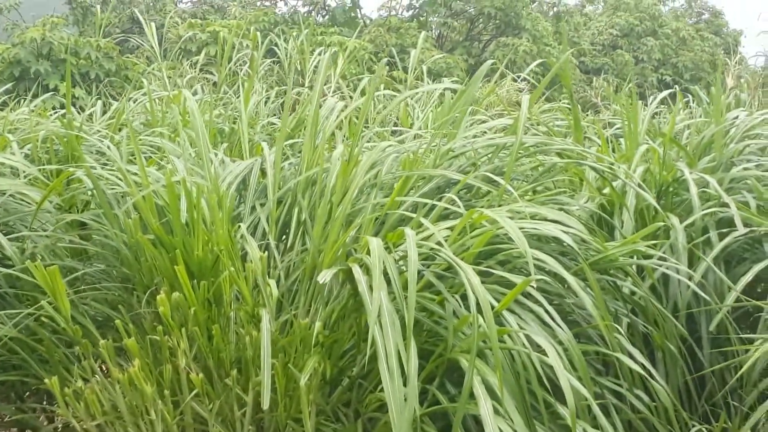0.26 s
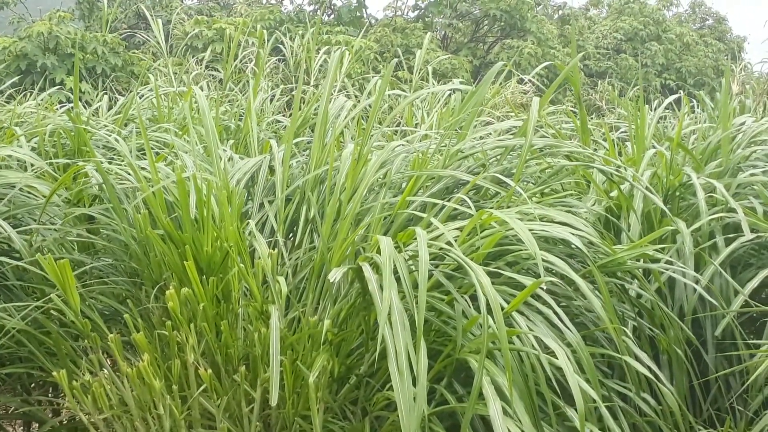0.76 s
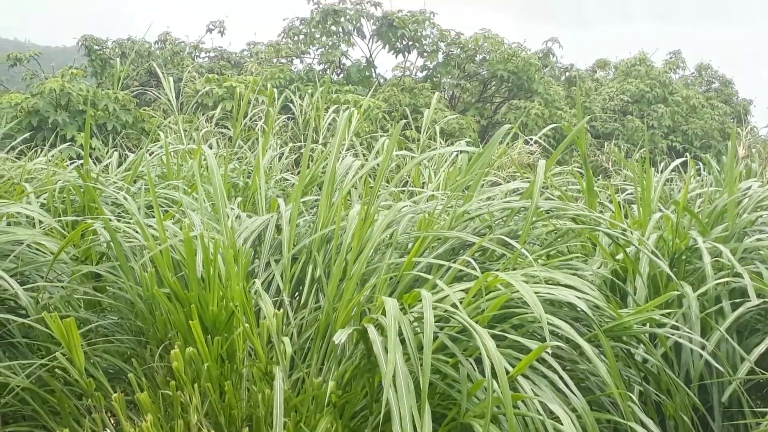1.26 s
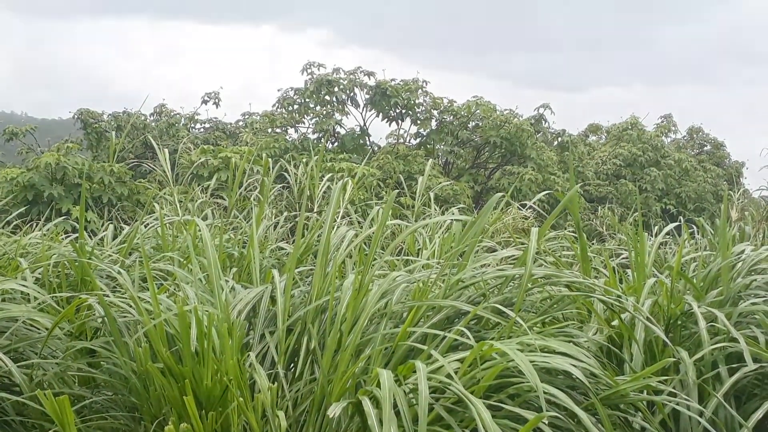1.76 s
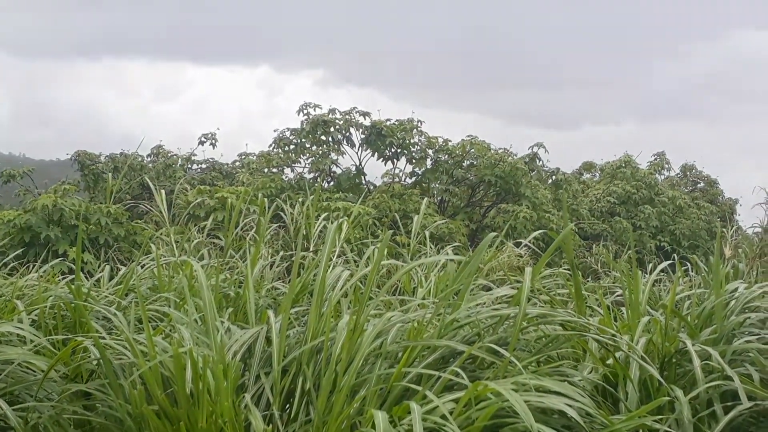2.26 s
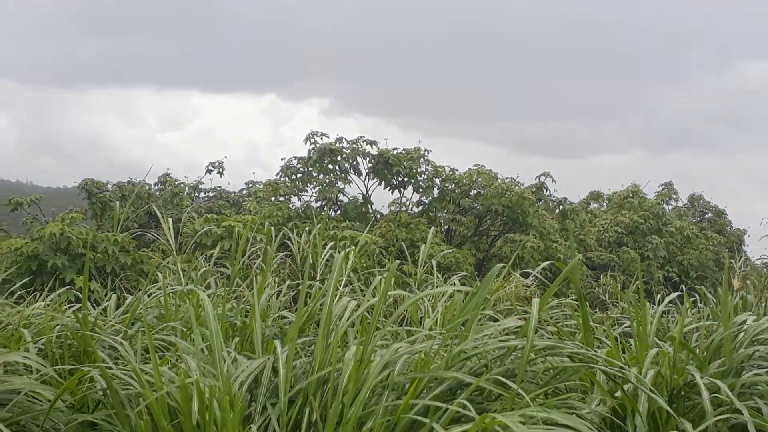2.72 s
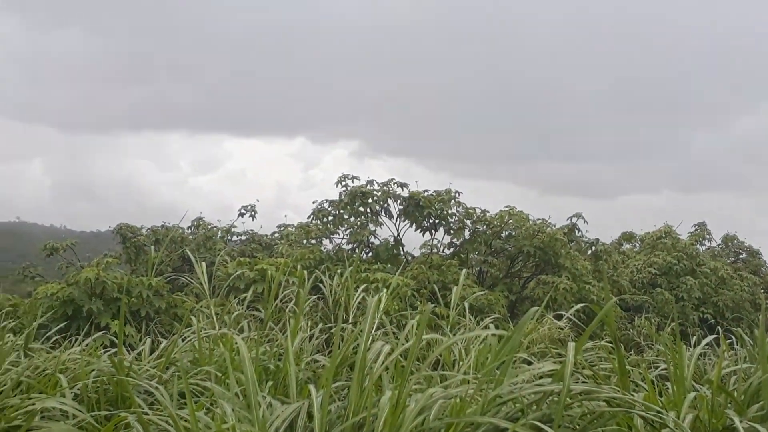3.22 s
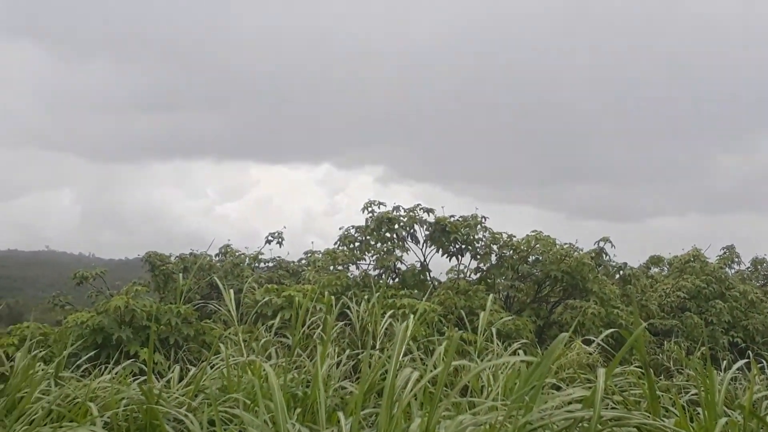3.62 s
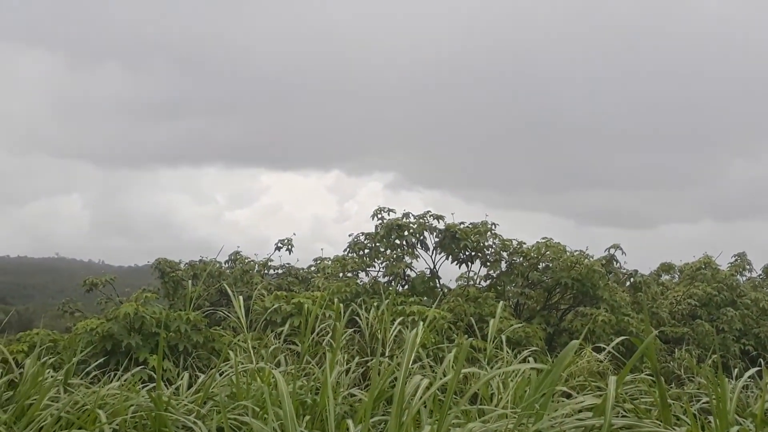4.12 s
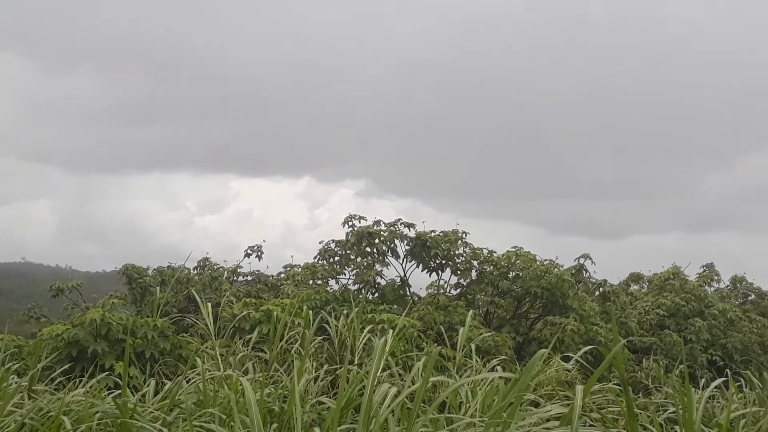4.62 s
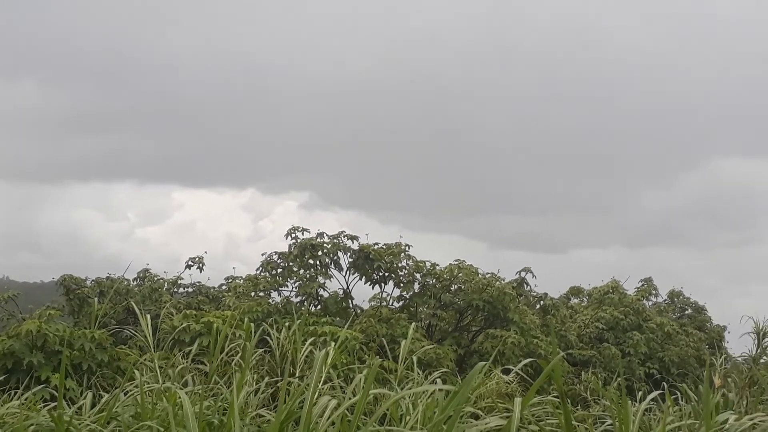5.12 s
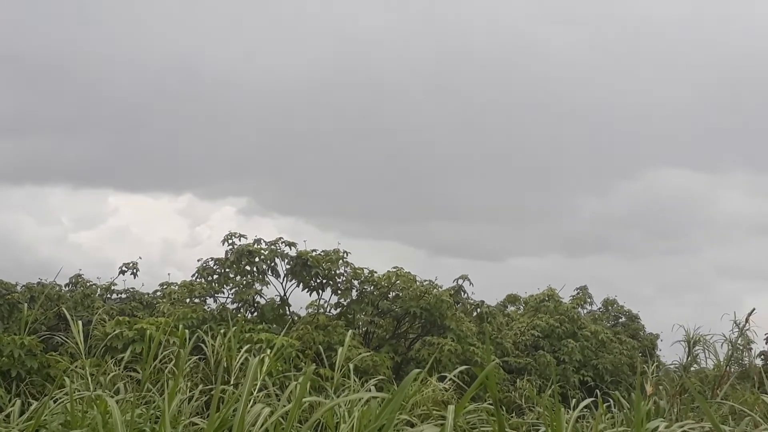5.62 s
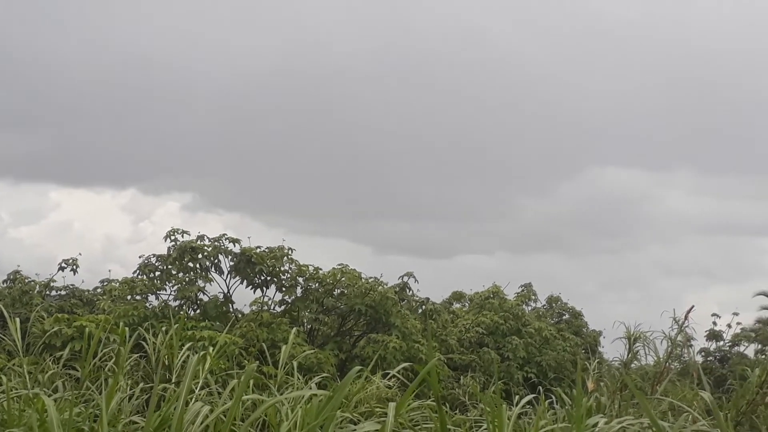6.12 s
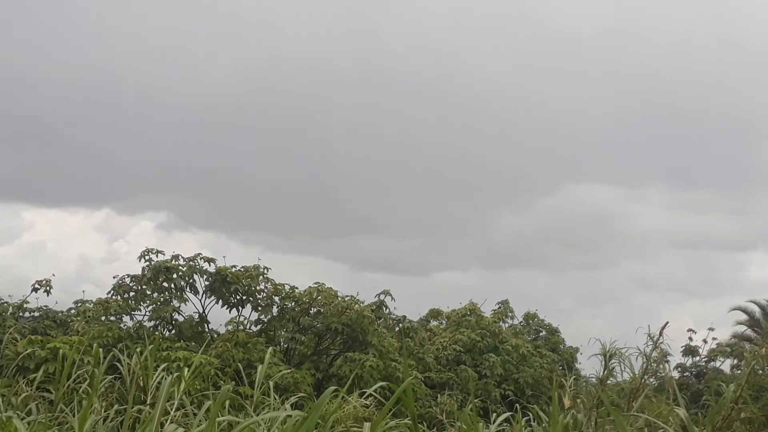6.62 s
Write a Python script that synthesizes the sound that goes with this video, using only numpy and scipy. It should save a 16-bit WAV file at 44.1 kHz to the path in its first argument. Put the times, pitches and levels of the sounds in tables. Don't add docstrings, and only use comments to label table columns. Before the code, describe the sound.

A small microphone stands among wet grass blades. Rain hiss runs throughout, under crisp irregular patter, bright ticks and a few hollow knocks. After about two seconds a bird gives thin gliding whistles, mostly falling, with one rising chirp; a very faint insect buzz follows. A low gust swells near four seconds, and the rain gradually eases while sparse drops and weak bird notes continue over a barely audible motor.

```python
import sys
import numpy as np
from scipy import signal
from scipy.fft import rfft, irfft
from scipy.io import wavfile

SR = 44100
rng = np.random.default_rng(int(sys.argv[2]) if len(sys.argv) > 2 else 0)


def convert_level_to_amplitude(level_db):
    exponent = np.asarray(level_db, float) / 20
    return 10 ** exponent


def pcm_store(signal):
    levels = np.round(np.clip(np.atleast_2d(signal), -1, 1) * 32767)
    wavfile.write(sys.argv[1], SR, levels.astype(np.int16).T)


N = 302967
TREBLE_TOP_HZ = 15830


def rms_one(x):
    return x / np.sqrt(np.mean(x ** 2) + 1e-20)


def peak_one(x):
    return x / np.abs(x).max()


def in_time(rows):
    s, *columns = np.transpose(rows)
    return [np.interp(np.arange(N) / SR, s, c) for c in columns]


def at_hz(points, hz):
    point_hz, point_db = np.transpose(points)
    return np.interp(np.log(hz), np.log(point_hz), point_db)


def colour(x, spectrum):
    hz = np.maximum(np.arange(N // 2 + 1) * SR / N, 1)
    return irfft(rfft(x) * convert_level_to_amplitude(at_hz(spectrum, hz)), N)


def band(x, low_hz, high_hz):
    edges = [low_hz, min(high_hz, .45 * SR)]
    return signal.sosfilt(signal.butter(2, edges, "band", fs=SR, output="sos"), x)


def drift(rate):
    r = np.exp(-80 * np.pi * rate / SR)
    slow = signal.lfilter([1], [1, -2 * r, r * r], rng.standard_normal(N // 40 + 2002))[2000:]
    return np.interp(np.arange(N) / 40, np.arange(len(slow)), rms_one(slow))


def ring(clicks, hz, t60):
    r, w = convert_level_to_amplitude(-60 / (t60 * SR)), 2 * np.pi * hz / SR
    return signal.lfilter([0, np.sin(w)], [1, -2 * r * np.cos(w), r * r], clicks + 1e-18)


def fade(t, t60):
    return convert_level_to_amplitude(-60 * t / t60)


def hiss(patchy_db):
    out, together = 0, drift(23.5)
    edges = 200 * 2 ** np.arange(0, 6.9, .5)
    white = rng.standard_normal((2, N))
    for k, (low, high) in enumerate(zip(edges, edges[1:])):
        gain = convert_level_to_amplitude(patchy_db * (0.091 * together + drift(23.0)))
        out = out + gain * band(white[k % 2], low, high)
    return out


def patter(per_s, spread_db, cycles, splash_db):
    largest = 1.8
    sizes = convert_level_to_amplitude(spread_db * np.minimum(rng.exponential(1, N), largest)) * rng.choice([-1, 1], N)
    born = rng.random(N) < per_s * convert_level_to_amplitude(3.2 * drift(20.0)) / SR
    pitches, dealt = np.geomspace(500, 15000, 18), rng.integers(0, 18, N)
    spray = rng.standard_normal(N)
    fizz = signal.lfilter([1], [1, -fade(1 / SR, 0.024)], np.abs(sizes * born))
    out = convert_level_to_amplitude(-16.5) * band(fizz * np.roll(spray, 999), 5000, 21000)
    for k, hz in enumerate(pitches):
        clicks = sizes * born * (dealt == k)
        wet = signal.lfilter([1], [1, -fade(1 / SR, 0.016)], np.abs(clicks))
        leaf = ring(clicks + convert_level_to_amplitude(splash_db) * wet * spray, hz, cycles / hz)
        out = out + leaf * (hz / 3000) ** 0.78
    return out


# (t/s, level/dB)
SHOWER = [(0.0, -50), (0.31, -52.5), (0.55, -50.5), (1.24, -49.5), (1.51, -48.5), (2.1, -49), (2.35, -51.5),
          (2.58, -50.5), (2.68, -52.5), (2.85, -51), (3.6, -52), (4.26, -52.5), (4.61, -52), (4.95, -53.5),
          (5.7, -54.5), (6.05, -53), (6.56, -55), (6.87, -54)]
# (f/Hz, level/dB per Hz)
FOLIAGE_COLOUR = [(180, -42), (300, -7), (397, -10.5), (808, -3.5), (968, -5), (1730, 1), (2610, 2),
                  (3750, -1.5), (5390, -7), (7370, -5), (8280, -12.5), (10100, -30), (14300, -22.5),
                  (15500, -26)]
# (f/Hz, level/dB per Hz)
RUMBLE = [(21, -34), (35, 2.5), (48, -5), (96, -5.5), (123, 1.5), (265, -9), (500, -20.5), (650, -22.5),
          (1100, -120)]
# (t/s, level/dB)
BREEZE = [(0, -67.5), (1.6, -61.5), (3.2, -64), (4.3, -66), (4.8, -61.5), (5.4, -63), (6.87, -62.5)]


def shower():
    roar_db, treble_below_db = -65, -19.5
    (hiss_db,), (breeze_db,) = in_time(SHOWER), in_time(BREEZE)
    far = rms_one(hiss(patchy_db=1.34))
    middle = rms_one(patter(per_s=480.0, spread_db=4.0, cycles=5.3, splash_db=-24.0))
    wet = colour(far + convert_level_to_amplitude(0.5) * middle, FOLIAGE_COLOUR)
    low = signal.sosfilt(signal.butter(8, 9400, fs=SR, output="sos"), wet)
    high = signal.sosfilt(signal.butter(8, 9400, "high", fs=SR, output="sos"), wet)
    high = irfft(rfft(high) * (np.arange(N // 2 + 1) * SR / N < TREBLE_TOP_HZ), N)
    rumble = colour(rng.standard_normal(N), RUMBLE) * convert_level_to_amplitude(1.0 * drift(1.9))
    roar = band(rng.standard_normal(N), 307, 1340)
    out = convert_level_to_amplitude(roar_db) * rms_one(roar) + convert_level_to_amplitude(breeze_db) * rms_one(rumble)
    out += convert_level_to_amplitude(hiss_db - 0.94) * rms_one(low)
    return out + convert_level_to_amplitude(hiss_db + treble_below_db) * rms_one(high)


# (t/s, f/Hz, level/dB)
MOTOR = [(0, 50.2, -84), (.45, 47.5, -73), (.9, 47.7, -71.5), (2.65, 45.6, -88), (2.8, 45.1, -67.5),
         (3.5, 49.4, -65.5), (3.95, 51.4, -68), (4.2, 51.27, -78.5), (4.35, 61.8, -100), (4.5, 61.4, -67),
         (4.8, 63.2, -80), (5.25, 53.5, -79), (5.8, 53.1, -74.5), (6.4, 56.86, -67.5), (6.87, 58.2, -65)]
# (multiple, level/dB)
MOTOR_ORDERS = [(1, -9), (2, 0.1), (3, -8)]


def motor():
    hz, level_db = in_time(MOTOR)
    phase = 2 * np.pi * np.cumsum(hz * (1 + 0.0052 * drift(2.8))) / SR
    out = np.zeros(N)
    for k, order_db in MOTOR_ORDERS:
        out += convert_level_to_amplitude(level_db + order_db + 3.5 + 2.0 * drift(9.7)) * np.sin(k * phase)
    return out


# (t/s, peak level/dB, leaf f/Hz)
BURSTS = [(0.0507, -40, 1310), (0.1332, -32, 2800), (0.378, -34.5, 2100), (0.4844, -43, 1573),
          (0.5492, -38, 1730), (0.6684, -32.5, 2400), (0.9077, -34, 2130), (1.1931, -33, 1780),
          (1.497, -33, 2600), (1.6914, -39, 2050), (1.7643, -39, 2070), (1.8676, -36, 1690),
          (2.2656, -34, 2100), (3.6387, -32.5, 2640), (4.0787, -35.5, 1700), (4.15, -41, 2000),
          (4.7287, -49, 1830), (5.265, -39, 1460)]
# (t/s, peak level/dB, leaf f/Hz)
SNAPS = [(0.004, -31, 2250), (0.0363, -44, 2440), (0.5631, -32.5, 7450), (0.7552, -31, 1760),
         (0.7625, -29.5, 4320), (0.7705, -38, 3200), (0.791, -30, 3340), (0.994, -35, 1560),
         (1.268, -30.5, 2520), (1.2935, -32, 2280), (1.3467, -30, 3020), (1.4455, -26.5, 3290),
         (1.5951, -35, 2080), (1.6043, -26, 2390), (1.8407, -38, 1960), (1.9737, -29.5, 1760),
         (1.9875, -25.5, 3460), (3.1988, -33.5, 3720), (3.6427, -38, 2430), (4.6876, -38, 3260),
         (4.7198, -34.5, 6400), (4.7292, -28, 2050), (4.733, -32, 1870), (4.7914, -40, 1460),
         (5.218, -32, 2836), (5.2798, -30, 3727), (5.8441, -30, 2730)]
# (t/s, peak level/dB, leaf f/Hz)
SPLATS = [(0.195, -34, 2400), (0.5062, -37, 2320), (0.5223, -29.5, 2030), (1.0181, -37, 2120),
          (1.7447, -32.5, 2950), (2.473, -31, 3280), (2.5461, -39, 3200), (2.743, -36, 4170),
          (3.6985, -40, 2380), (4.3885, -33.5, 2470), (4.4802, -32.5, 2300), (4.5186, -30, 1700),
          (4.8382, -41, 3130), (4.9716, -42, 3700), (5.3894, -29, 2310), (5.5695, -32.5, 2410),
          (5.7962, -31, 1600), (6.1496, -31, 3610), (6.352, -40, 1660), (6.4604, -33.5, 2240),
          (6.7978, -31.5, 2280)]
# (t/s, peak level/dB, leaf f/Hz)
TAPS = [(0.2495, -29, 4200), (0.408, -31.5, 2120), (0.7392, -44, 2600), (0.7447, -28, 2070),
        (0.9467, -26.5, 4650), (0.964, -35, 2620), (1.3745, -30, 3300), (1.5349, -30.5, 2170),
        (1.5484, -27.5, 2350), (1.6414, -27, 3830), (2.075, -38, 3000), (2.159, -32, 2160),
        (2.5196, -29, 3320), (2.585, -33, 3220), (3.332, -29.5, 4300), (3.5903, -24.5, 4300),
        (3.931, -32.5, 2880), (4.4563, -35, 2580), (4.5935, -30.5, 5060), (4.6086, -31.5, 2030),
        (4.6608, -37, 2490), (5.1771, -27.5, 2310), (5.227, -39, 2270), (6.053, -33.5, 1950),
        (6.118, -36, 3690), (6.3672, -26.5, 3160), (6.436, -37, 2700), (6.6099, -35.5, 1870),
        (6.8311, -35.5, 1750), (6.8521, -31, 3330)]
# (drops, snap level/dB, splash level/dB)
LEAVES = [(BURSTS, -3.5, -1.1), (SNAPS, -9, -9.5), (SPLATS, -34, -4.5), (TAPS, -37, -14)]


def near_drops():
    out, t = np.zeros(N + 2048), np.arange(2048) / SR
    hits = []
    for rows, snap_db, splash_db in LEAVES:
        hits += [(s, db, hz, db + snap_db, splash_db) for s, db, hz in rows]
    luck, noise = rng.random((len(hits), 3)), rng.standard_normal((len(hits), 2, 2048))
    snaps = band(band(noise[:, 1] * fade(t, 0.0042), 5570, 8800), 2700, 7900)
    for (s, peak_db, hz, snap_db, splash_db), (a, b, c), n, snap in zip(hits, luck, noise[:, 0], snaps):
        leaf = np.sin(2 * np.pi * hz * t) * fade(t, 21.2 / hz)
        leaf += 0.36 * np.sin(2 * np.pi * hz * (0.87 + 0.4 * a) * t) * fade(t, 15.0 / hz)
        leaf *= np.minimum(t * hz / 0.56, 1)
        leaf += 0.5 * np.sin(2 * np.pi * hz * t) * fade(t, 1.8 / hz)
        spray = band(n, hz / 1.65, hz * 1.58) * 1.73
        spray *= fade(t, 0.071 + 0.021 * b) * np.minimum(t / 0.0033, 1)
        i = round((s + .0008) * SR)
        out[i:i + 2048] += np.sign(c - .5) * convert_level_to_amplitude(peak_db - 4.5) * (leaf + convert_level_to_amplitude(splash_db) * spray)
        out[i:i + 2048] += convert_level_to_amplitude(snap_db + 2.5) * peak_one(snap)
    return signal.sosfilt(signal.butter(3, 8800, fs=SR, output="sos"), out[:N])


# (t/s, peak level/dB, f/Hz)
PLINKS = [(0.0098, -34, 4300), (0.2027, -39, 2560), (0.5074, -38, 4120), (0.5493, -35, 3050),
          (0.5552, -37, 4230), (0.5687, -37, 2000), (0.7715, -41, 4100), (1.0194, -34, 2130),
          (1.1617, -39, 6530), (1.2693, -38, 4020), (1.6052, -39, 4150), (1.6114, -30, 2590),
          (1.6174, -39, 6940), (1.7001, -34, 2120), (1.842, -37, 2720), (1.8735, -33, 6300),
          (2.0508, -42, 6990), (2.2176, -44, 6640), (2.2935, -42, 7100), (2.386, -40, 3900),
          (2.4563, -43, 3640), (2.5839, -34, 2000), (2.6472, -39, 7260), (3.2412, -43, 1340),
          (3.9322, -42, 1220), (4.4124, -41, 4030), (4.5254, -42, 1720), (4.7922, -43, 6890),
          (5.1784, -42, 7620), (5.2728, -53, 7400), (5.4438, -42, 2110), (5.7984, -36, 2720),
          (5.8383, -48, 6640), (5.8516, -41, 4060), (5.9054, -48, 7070), (6.0533, -37, 2750),
          (6.2879, -45, 6890), (6.6094, -40, 3880)]


def plinks():
    ring_cycles = 20
    out, t = np.zeros(N + 1024), np.arange(1024) / SR
    for s, peak_db, hz in PLINKS:
        leaf = np.sin(2 * np.pi * hz * t) + 0.13 * np.sin(2 * np.pi * 1.14 * hz * t)
        leaf *= fade(t, ring_cycles / hz) * np.minimum(t * hz / 0.56, 1)
        i = round(s * SR)
        out[i:i + 1024] += convert_level_to_amplitude(peak_db + 0.5) * leaf
    return out[:N]


# (t/s, peak level/dB)
TICKS = [(0.0518, -52), (0.5631, -47), (0.6679, -39), (0.6998, -50), (0.7617, -47), (0.8655, -38),
         (1.2493, -36), (1.3778, -50), (1.5469, -46), (1.6926, -56), (1.9869, -54), (2.2109, -47),
         (2.283, -45), (2.4733, -53), (2.648, -51), (2.7427, -55), (2.756, -34), (3.572, -53),
         (3.6386, -45), (3.85, -43), (3.995, -42), (4.078, -42), (4.4822, -55), (4.6603, -44), (4.721, -37),
         (5.7276, -53)]


def ticks():
    port_dip_hz = 10600
    out, t = np.zeros(N + 2048), np.arange(2048) / SR
    noise = rng.standard_normal((len(TICKS), 2048))
    decay = fade(t, 0.0058) + 0.072 * fade(t, 0.022)
    for (s, peak_db), n in zip(TICKS, noise):
        i = round((s + .0004) * SR)
        out[i:i + 2048] += convert_level_to_amplitude(peak_db + 6.0) * peak_one(band(n * decay, 4800, 20400))
    out = signal.lfilter(*signal.iirnotch(port_dip_hz, 1.6, fs=SR), out)
    return signal.sosfilt(signal.cheby2(12, 70, 16600, fs=SR, output="sos"), out[:N])


# (t/s, peak level/dB, f/Hz)
PATS = [(0.0528, -34, 5200), (0.1437, -29.5, 3000), (0.249, -30, 3600), (0.379, -31, 3700),
        (0.4846, -31.5, 5300), (0.5282, -32, 2400), (0.5646, -27, 4530), (0.5915, -36, 6000),
        (0.7623, -28.5, 4600), (0.8729, -32.5, 2290), (0.887, -30.5, 3380), (0.9658, -33, 2800),
        (1.2013, -36, 2800), (1.25, -37, 6400), (1.3467, -28.5, 4300), (1.4213, -35, 3100),
        (1.428, -35, 2700), (1.6115, -34, 2500), (1.6176, -34, 5400), (1.767, -28.5, 3400),
        (1.809, -44, 3100), (1.9756, -34, 2500), (2.1471, -43, 3480), (2.218, -36, 4900),
        (2.3132, -38, 3400), (2.4747, -31, 3900), (2.6763, -42, 4600), (2.7437, -29.5, 3700),
        (2.9482, -31, 3900), (3.0703, -36, 4190), (3.3033, -34, 2870), (3.4739, -52, 3920),
        (3.8517, -36, 4500), (4.0031, -34, 4340), (4.197, -36, 3340), (4.2935, -31, 3900),
        (4.571, -34.5, 2210), (4.84, -35, 3420), (4.9372, -38, 3680), (4.9434, -35, 3300),
        (4.9733, -35, 3080), (4.9931, -37, 4300), (5.048, -41, 3200), (5.2285, -38, 3200),
        (5.2728, -43, 5400), (5.379, -34, 2900), (5.4353, -34.5, 2800), (5.5966, -35, 2300),
        (5.6433, -44, 3900), (5.6569, -40, 3800), (5.8877, -36, 5900), (5.914, -36.5, 3900),
        (5.9927, -38, 4740), (6.2709, -40, 3910), (6.2887, -38, 4010), (6.3002, -36, 3790),
        (6.3556, -47, 3800), (6.3687, -38, 3000), (6.4667, -38, 3100), (6.4806, -33.5, 4400)]
# (t/s, peak level/dB, f/Hz)
LIGHT_PATS = [(0.0623, -37, 1700), (0.1938, -35, 3200), (0.2945, -41, 2400), (0.5077, -38, 3200),
              (0.5425, -36, 2720), (0.6337, -35, 3400), (0.6617, -36, 2100), (0.7401, -45, 2710),
              (0.74, -43, 2600), (0.8648, -32, 2900), (1.07, -37, 4000), (1.0774, -44, 3400),
              (1.0952, -35, 2700), (1.3686, -31, 2900), (1.5559, -33, 3100), (1.684, -37, 2600),
              (2.0784, -39, 2990), (2.1131, -42, 2900), (2.4561, -38, 3500), (3.0034, -37, 3100),
              (3.0824, -40, 3800), (3.264, -32, 2400), (3.2818, -38, 3293), (3.7454, -46, 2303),
              (3.8065, -48, 3100), (3.8711, -34, 2800), (3.9891, -43, 2800), (3.9963, -40, 2800),
              (4.1449, -36, 3400), (4.2033, -40, 3200), (4.2235, -42, 3000), (4.2883, -39, 3500),
              (4.6784, -36, 2600), (5.0534, -42, 2815), (5.0656, -51, 2580), (5.522, -38, 2500),
              (5.6227, -45, 3110), (5.7036, -39, 3600), (5.8792, -47, 2900), (5.9533, -42, 2930),
              (5.9626, -40, 2797), (6.4899, -42, 2800), (6.5295, -39, 3100), (6.5754, -38, 3076),
              (6.76, -40, 2400)]


def pats(rows):
    tail_db, tail_t60_s, bass_cut_hz = -12, 0.05, 790
    out, t = np.zeros(N + 2048), np.arange(-64, 1984) / SR
    noise = rng.standard_normal((len(rows), 2048))
    for (s, peak_db, hz), n in zip(rows, noise):
        u = t * hz * 3.96
        hit = (u ** 2 - 1 - 0.45 * u) * np.exp(-u ** 2 / 2)
        spatter = band(n, hz / 1.5, hz * 1.12)
        tail = peak_one(spatter * fade(np.abs(t), tail_t60_s) * (t > 0))
        i = round(s * SR) - 64
        out[i:i + 2048] += convert_level_to_amplitude(peak_db) * (hit + convert_level_to_amplitude(tail_db) * tail)
    return signal.sosfilt(signal.butter(2, bass_cut_hz, "high", fs=SR, output="sos"), out[:N])


# (t/s, peak level/dB, body f/Hz, t60/s, top of the puff f/Hz)
BUMPS = [(0.056, -34.5, 155, 0.04, 900), (0.489, -49, 95, 0.15, 180), (0.583, -46.5, 92, 0.16, 210),
         (1.04, -52, 183, 0.11, 230), (1.364, -48.5, 94, 0.18, 230), (1.395, -53, 125, 0.16, 170),
         (1.479, -50, 90, 0.14, 150), (1.902, -51, 253, 0.19, 350), (3.161, -45.5, 150, 0.12, 433),
         (3.235, -44.5, 181, 0.094, 260), (4.737, -38.5, 132, 0.057, 270), (6.089, -46, 145.2, 0.068, 300)]


def bumps():
    out, t = np.zeros(N + 8192), np.arange(8192) / SR
    noise = rng.standard_normal((len(BUMPS), 8192))
    for (s, peak_db, hz, t60, top_hz), puff in zip(BUMPS, noise):
        body = np.sin(2 * np.pi * hz * t) + 0.65 * rms_one(band(puff, 66, top_hz))
        i = round(s * SR)
        out[i:i + 8192] += convert_level_to_amplitude(peak_db + 1) * body * fade(t, max(t60, .02)) * (1 - np.exp(-t / 0.006))
    return out[:N]


# (t/s, peak level/dB, length/ms)
CRACKS = [(0.1333, -35, 0.38), (0.6690, -29, 0.15), (0.7452, -28, 0.2), (0.9482, -36, 0.13),
          (1.0196, -35, 0.3), (1.1938, -26, 0.21), (1.4977, -37, 0.16), (1.9880, -19.5, 0.19),
          (3.64, -24, 0.15), (4.1502, -33, 0.2), (5.1777, -38, 0.34), (5.28, -40, 0.2), (5.5695, -36, 0.3),
          (6.3682, -36, 0.2), (6.4624, -42, 0.23)]


def cracks():
    out, t = np.zeros(N + 256), np.arange(-64, 192) / SR
    for s, peak_db, length_ms in CRACKS:
        quarter_s = length_ms / 4000
        u, v = t / quarter_s, (t - .00055) / quarter_s
        flip = -u * np.exp(.5 - u ** 2 / 2) - 0.22 * v * np.exp(.5 - v ** 2 / 2)
        i = round(s * SR) - 64
        out[i:i + 256] += convert_level_to_amplitude(peak_db) * flip
    return out[:N]


# (t/s, peak level/dB)
MIST = [(0.6752, -51), (0.7835, -59), (0.9301, -57), (0.9903, -53), (1.0195, -55), (1.3708, -57),
        (1.3878, -56), (1.5549, -57), (1.6609, -52), (1.875, -56), (1.9085, -62), (2.013, -52),
        (2.2168, -52), (2.2819, -53), (2.5464, -54), (2.9709, -56), (2.9855, -59), (3.0697, -58),
        (3.1486, -55), (3.332, -59), (3.5549, -57), (3.5683, -60), (3.8756, -58), (3.9813, -59),
        (4.0194, -53), (4.3839, -58), (4.483, -56), (4.8483, -58), (4.9344, -61), (5.1803, -58),
        (5.4079, -51), (5.8784, -60)]


def mist():
    out, t = np.zeros(N + 512), np.arange(512) / SR
    noise = rng.standard_normal((len(MIST), 512))
    for (s, peak_db), n in zip(MIST, noise):
        i = round(s * SR)
        out[i:i + 512] += convert_level_to_amplitude(peak_db + 2.0) * peak_one(band(n * fade(t, 0.01), 9500, 16700))
    return signal.sosfilt(signal.cheby2(12, 70, TREBLE_TOP_HZ, fs=SR, output="sos"), out[:N])


# (t/s, peak level/dB, f/Hz)
KNOCKS = [
    (0.745, -26.5, 1100),
    (0.7442, -32.5, 764),
    (3.6398, -28, 2480),
    (2.547, -22, 1620),
    (2.583, -28, 766),
    (3.718, -32, 770),
    (4.068, -34, 1300),
    (5.796, -42, 1530),
    (6.759, -42, 725),
]


def knocks():
    out, t = np.zeros(N + 2048), np.arange(2048) / SR
    for s, peak_db, hz in KNOCKS:
        stem = np.sin(2 * np.pi * hz * t) + 1.0 * np.sin(2 * np.pi * 1.43 * hz * t)
        i = round(s * SR)
        out[i:i + 2048] += convert_level_to_amplitude(peak_db - 7.5) * stem * fade(t, 18.0 / hz) * np.minimum(t * hz / 1.4, 1)
    return out[:N]


# (t/s, f/Hz, level/dB)
BIRD = [
    [(1.92, 3720, -58), (1.95, 3520, -60), (1.99, 3310, -60), (2.04, 3140, -58), (2.08, 3030, -61),
     (2.115, 2980, -58)],
    [(2.272, 4270, -56), (2.33, 4070, -59), (2.38, 3860, -54), (2.42, 3610, -57), (2.46, 3430, -56),
     (2.51, 3340, -57), (2.55, 3300, -55), (2.6, 3280, -54)],
    [(2.748, 4120, -53), (2.772, 4450, -49), (2.79, 4750, -56), (2.812, 4950, -61), (2.855, 5100, -54),
     (2.885, 5200, -64), (2.94, 5200, -61)],
    [(2.86, 4950, -67), (2.893, 4680, -60), (2.912, 4450, -52), (2.94, 4100, -61), (2.978, 3830, -51),
     (3.003, 3570, -58), (3.03, 3400, -62)],
]
# (t/s, length/s, first f/Hz, last f/Hz, level/dB)
ANSWERS = [
    (1.685, .06, 3700, 3480, -59),
    (3.965, .06, 3600, 3250, -61),
    (4.025, .05, 3100, 2850, -61),
    (4.14, .085, 3480, 3100, -62),
    (4.25, .05, 3050, 2780, -65),
    (4.89, .13, 3840, 3800, -67),
    (5.605, .045, 4000, 3720, -62),
    (5.9, .05, 3100, 3000, -66),
    (6.09, .05, 3050, 4050, -61),
    (6.16, .035, 4050, 3300, -56),
]
# (delay t/s, level/dB)
BIRD_ECHOES = [(.008, -4), (.016, -3), (.025, -2), (.036, -6), (.055, -4), (.066, -9)]


def bird():
    hoarse = .3
    swell_db, foliage_t60_s, foliage_db = 2, .3, -5
    direct, t = np.zeros(N), np.arange(N) / SR
    waver, flutter, throb = drift(70.0), drift(41.0), drift(150.0)
    answers = []
    for s, length, first, last, db in ANSWERS:
        middle = (s + length / 2, (first + last) / 2, db)
        answers.append([(s, first, db - swell_db), middle, (s + length, last, db - swell_db)])
    for note in BIRD + answers:
        s, hz, level_db = np.transpose(note)
        on = slice(round(s[0] * SR), round(s[-1] * SR))
        gate = np.clip(np.minimum(t[on] - s[0], s[-1] - t[on]) / 0.007, 0, 1)
        glide_hz = np.interp(t[on], s, hz) * (1 + 0.008 * waver[on])
        phase = 2 * np.pi * np.cumsum(glide_hz) / SR
        breath = convert_level_to_amplitude(np.interp(t[on], s, level_db) - 1.2 + 1.5 * flutter[on])
        direct[on] += gate * breath * (1 + hoarse * throb[on]) * np.sin(phase)
    scatter = rng.standard_normal(SR // 3) * fade(t[:SR // 3], foliage_t60_s)
    scatter *= convert_level_to_amplitude(foliage_db) / np.sqrt(np.sum(scatter ** 2))
    out = direct + signal.fftconvolve(direct, scatter)[:N]
    for delay, echo_db in BIRD_ECHOES:
        out += convert_level_to_amplitude(echo_db + 3.0 * drift(40.0)) * np.roll(direct, round(delay * SR))
    return out


# (t/s, level/dB)
INSECT = [(2.98, -95), (3.05, -78), (3.2, -80), (3.38, -80), (3.45, -95)]
# (f/Hz, width f/Hz, level/dB)
INSECT_MODES = [(10700, 320, -1), (12100, 350, -4)]


def insect():
    level_db, = in_time(INSECT)
    scrape = rng.standard_normal(N) * convert_level_to_amplitude(1.8 * drift(40.0))
    gate = level_db > min(db for s, db in INSECT)
    buzz = np.zeros(N)
    for hz, width, db in INSECT_MODES:
        buzz += convert_level_to_amplitude(db) * rms_one(band(scrape, hz - width / 2, hz + width / 2))
    return gate * convert_level_to_amplitude(level_db) * buzz


def gust():
    start_s, rise_s, t60_s, level_db = 3.66, 0.092, 7, -64.5
    t = np.maximum(np.arange(N) / SR - start_s, 0)
    air = rms_one(band(rng.standard_normal(N), 38, 66))
    return convert_level_to_amplitude(level_db) * air * (1 - np.exp(-t / rise_s)) * fade(t, t60_s)


def scene():
    drops = near_drops() + plinks() + ticks() + pats(PATS) + pats(LIGHT_PATS) + cracks() + mist() + knocks()
    mono = shower() + motor() + drops + bumps() + bird() + insect() + gust()
    return np.array([mono, mono])


def band_limit(x):
    return signal.sosfilt(signal.butter(12, 16510, fs=SR, output="sos"), x)


def record(dry):
    bass_cut_hz, offset = 62, -.0005
    dry = signal.sosfilt(signal.butter(4, bass_cut_hz, "high", fs=SR, output="sos"), dry)
    apart = convert_level_to_amplitude(-14.0) * band(dry[0], 10500, 14800) * drift(300.0)
    apart += convert_level_to_amplitude(-26.5) * band(dry[0], 243, 680) * drift(30.0)
    return band_limit(dry + apart * [[1], [-1]] + offset)


dry = scene()
out = record(dry)
pcm_store(out)
```